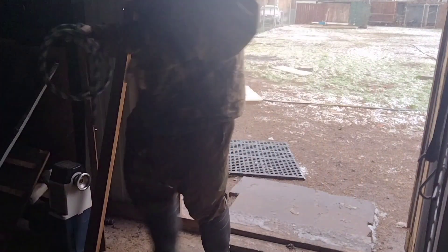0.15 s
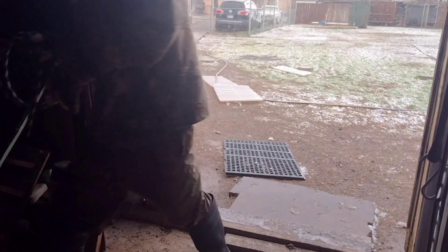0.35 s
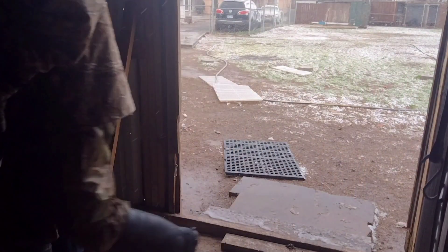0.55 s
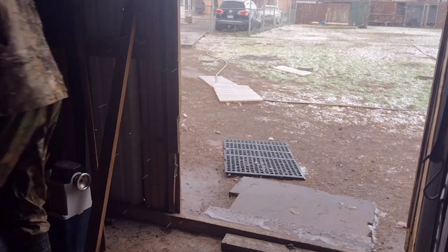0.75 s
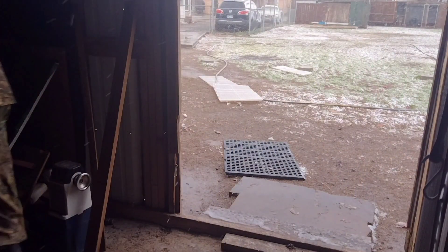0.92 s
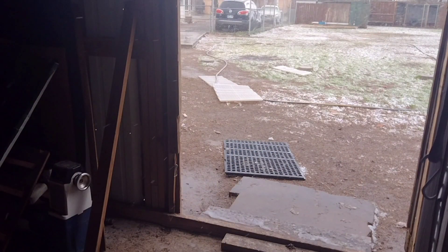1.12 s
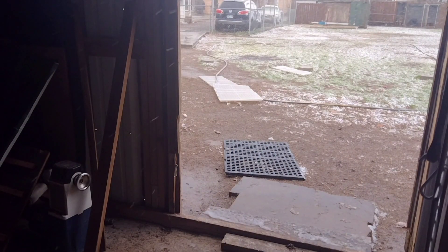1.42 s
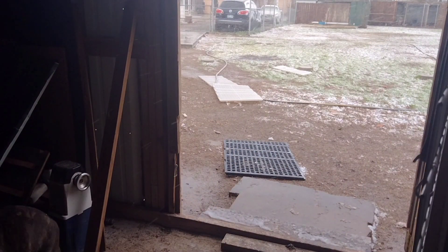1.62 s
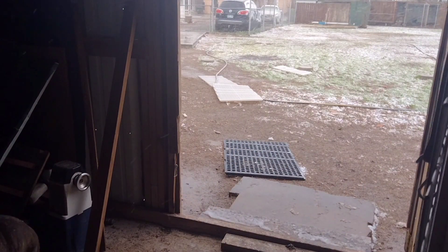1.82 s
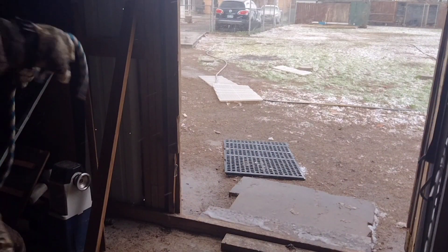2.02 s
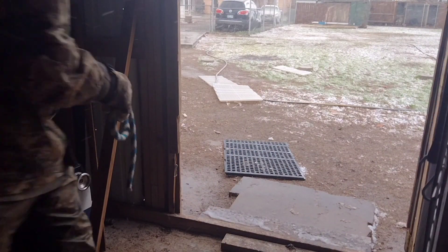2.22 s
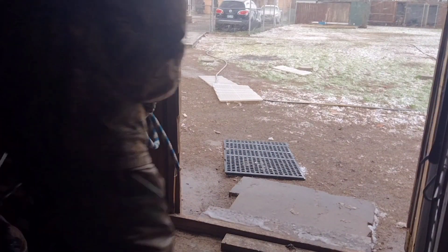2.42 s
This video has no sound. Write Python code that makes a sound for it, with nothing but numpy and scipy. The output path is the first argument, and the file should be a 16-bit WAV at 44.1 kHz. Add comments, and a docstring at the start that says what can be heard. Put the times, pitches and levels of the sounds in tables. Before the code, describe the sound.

Close, heavy boot steps knock on wooden boards inside a small shed, bunched at first, then evenly spaced. Soles scrape on grit, a boot clacks against something hard, and clothes rustle softly above a faint outdoor rumble.

```python
"""Heavy rubber boots thud and knock across the plank floor of a shed, close to a two-port microphone.
Each blow excites the damped modes of the boards; soles scrape and crack grit, and a boot clacks on
something hard. Clothing rustles by friction, the wooden walls reverberate briefly, and a low outdoor
rumble lies underneath. The sound drops out for a moment before one step."""
import sys
import numpy as np
from scipy import signal
from scipy.fft import rfft, irfft, next_fast_len
from scipy.io import wavfile
from scipy.ndimage import uniform_filter1d

SR = 44100
rng = np.random.default_rng(int(sys.argv[2]) if len(sys.argv) > 2 else 0)


def pcm_store(signal):
    """Save signal as 16-bit PCM."""
    levels = np.round(np.clip(np.atleast_2d(signal), -1, 1) * 32767)
    wavfile.write(sys.argv[1], SR, levels.astype(np.int16).T)


N = 112454

# Boot blows: start_s, thud_db, pitch_hz, contact_scale, knock_db
BOOT_BLOWS = [(0.0, -37, 76, 1.9, -70), (0.084, -39, 74.4, 2.46, -45), (0.2401, -8, 206.3, 1.06, -27),
              (0.256, -5, 259, 1.43, -20.5), (0.293, -12.5, 272, 0.846, -21), (0.324, -21.5, 101, 1, -19.5),
              (0.377, -21, 250, 1.46, -69), (0.439, -32.5, 74, 1.14, -62), (0.467, -14.5, 160, 1.27, -21.5),
              (0.545, -14, 204, 1.11, -32), (0.68, -32.5, 90, 0.1, -57), (0.984, -42, 272, 0.79, -27.5),
              (1.0565, -16.5, 167.5, 1.2, -40.5), (1.128, -28.5, 197, 1.38, -58),
              (1.298, -32.5, 235.7, 2.9, -68), (1.407, -33.5, 237, 1.9, -79),
              (1.558, -12.5, 206, 0.48, -23), (1.57, -9, 221, 0.49, -26), (1.582, -6.5, 292, 0.825, -30),
              (1.604, -20.5, 283, 0.23, -24), (1.637, -27, 250, 0.7, -27.5), (1.973, -25, 64.8, 1.23, -68),
              (1.989, -27, 134, 0.92, -46), (2.034, -28, 111.5, 0.83, -49), (2.06, -30.5, 74.6, 0.72, -52),
              (2.1917, -11.5, 206.5, 1.37, -23.5), (2.288, -29, 192, 0.87, -44.5),
              (2.502, -33, 196, 0.81, -57)]
# Floorboard modes: frequency_hz, level_db, t60_s
BOARD_MODES = [(48.3, 10.5, 0.4), (68.2, 10.5, 0.15), (97.6, 1, 0.067), (125.4, -0.5, 0.099),
               (157.3, 1, 0.088), (196.2, -1, 0.22), (232.7, -2.5, 0.23), (276.7, -1.5, 0.22),
               (321.6, -1.5, 0.36), (400, -1, 0.13), (452.5, 2, 0.16), (541.4, -2, 0.13), (667, 5.5, 0.028),
               (807, -1, 0.05), (963, 1, 0.03), (1170, -5, 0.021)]
# Sole scrapes: start_s, rise_s, hold_s, level_db, hold_change_db, release_db_per_s, bright_share
SOLE_SCRAPES = [(0.238, 0.0049, 0.017, -17.5, -8, 500, 0.86), (0.247, 0.0026, 0.084, -24, -0.5, 292, 0.65),
                (0.702, 0.12, 0.019, -33, -5.5, 346, 1.0), (0.909, 0.031, 0.019, -29.5, -1, 400, 0.2),
                (0.96, 0.0035, 0.018, -27.5, 1, 391, 1), (0.97, 0.0048, 0.083, -25, -7.5, 212, 0.02),
                (1.127, 0.029, 0.047, -53, 9, 164, 0.8), (1.55, 0.011, 0.028, -26, 4.5, 222, 0.27),
                (2.202, 0.044, 0.014, -40.5, -6.5, 158, 0.55), (2.44, 0.048, 0.026, -44, -17, 100, 0)]
# Spectra of dull and bright friction: frequency_hz, density_db
DULL_SPECTRUM = [(240, 8), (400, 1.5), (730, -1), (1420, 4.5), (3310, -1.5), (3930, -10), (5430, -22),
                 (16000, -81)]
BRIGHT_SPECTRUM = [(710, -26), (1200, -19.5), (2110, -10.5), (2830, -7.5), (3050, -5.5), (8080, -7.5),
                   (16000, -16.5)]
# Taps on a hard object: start_s, level_db
BOOT_CLACKS = [(0.9649, -20), (0.972, -17.5), (0.977, -22)]
# Modes of that object: frequency_hz, level_db, t60_s
HARD_MODES = [(680, -7, 0.05), (1290, -5, 0.04), (1415, -2, 0.04), (1545, 0, 0.04), (1680, -1, 0.035),
              (1900, -5, 0.03)]
# Cracking grains: start_s, level_db, pitch_hz
GRIT_CRACKS = [(0.246, -16, 2570), (1.5704, -23, 2630), (1.584, -25, 3400), (1.6087, -21, 2420)]
# Rustle envelope: time_s, level_db
RUSTLE_LEVEL = [(0, -47.5), (.2, -48.5), (.45, -46.5), (.7, -50.5), (1.1, -44), (1.3, -53), (1.54, -55.5),
                (1.72, -41), (1.8, -45), (1.87, -39), (1.99, -36.5), (2.04, -38.5), (2.1, -44.5),
                (2.19, -39.5), (2.31, -47), (2.42, -48.5), (2.55, -44)]
# Fabric spectrum: frequency_hz, density_db
CLOTH_SPECTRUM = [(710, -19), (1200, -10), (1720, -9.5), (3510, -1), (6100, -3), (6950, -1.5), (9210, -6.5),
                  (16000, -8.5)]
# Thin squeaks: start_s, length_s, centre_hz, half_width_hz, level_db
CLOTH_SQUEAKS = [(0.15, .07, 2640, 150, -51), (1.81, .26, 6850, 420, -42.5)]
# Reverberation time of the shed: frequency_hz, t60_s
SHED_DECAY = [(100, 0.33), (1000, 0.19), (10000, 0.12)]
# Outdoor noise spectrum: frequency_hz, density_db
AIR_SPECTRUM = [(18, -12), (55, 4), (280, -6), (569, -11), (1720, -17.5), (1860, -16.5), (2060, -17),
                (4300, -26.5), (16000, -59)]
# Rumble envelope: time_s, gain_db
RUMBLE_GAIN = [(0, 13), (.22, 0.5), (.6, 4), (.9, -1), (1.2, 8.5), (1.5, -2), (1.75, 5), (2.1, 10),
               (2.55, 6)]
# Level difference between the ports: frequency_hz, left_minus_right_db
PORT_DIFFERENCE = [(60, 0), (100, 4.5), (200, 0.5), (2000, -1.5), (3300, -0.5), (5500, -7.5), (9000, 2.5),
                   (15000, -1.5)]
# Part of the right port's signal shared by the left: frequency_hz, amplitude_ratio
PORT_SHARE = [(70, 0.91), (160, 0.93), (700, 0.94), (1500, 0.16), (4000, 0.19), (15000, 0.077)]


def floorboards():
    """Modal response: a blow swells the modes near its pitch (thud); upper modes ring and rattle (knock)."""
    thud_width_octaves, rise_cycles, sweep, detune = 0.4, 1.1, 2.067, 0.033
    push_s, damping_db_per_s, max_damping_db = .016, 1300, 21
    knock_from_hz, knock_rise_s, knock_t60_s, mode_blur = 380, .002, 0.12, 4.5
    strike_db, strike_rise_s, far_path_s = -3, 0.00049, .004
    hz, mode_db, t60 = np.transpose(BOARD_MODES)[:, :, None]

    def upper_resonances(f):
        return np.sqrt(sum(amp(db) ** 2 / (1 + ((f - centre) * decay / mode_blur) ** 2) ** 2
                           for centre, db, decay in BOARD_MODES if centre > knock_from_hz))

    rattle = unit_rms(filtered(rng.standard_normal((2, N)), upper_resonances))
    t = np.arange(SR // 2) / SR
    ringing, rattle_envelope = np.zeros((2, N + SR))
    for start_s, thud_db, pitch_hz, contact_scale, knock_db in BOOT_BLOWS:
        omega = 2 * np.pi * hz * (1 + detune * rng.standard_normal(hz.shape))
        weights = np.exp(-.5 * (np.log2(hz / pitch_hz) / thud_width_octaves) ** 2)
        rise_s, contact_s = rise_cycles / pitch_hz, push_s * contact_scale
        settled_s = np.maximum(t - rise_s - contact_s, 0)
        # Quadratic phase: higher modes peak early in the contact, lower ones late.
        phase = np.pi * sweep * contact_s * (hz - pitch_hz) ** 2 / pitch_hz
        modes = amp(mode_db - 60 * settled_s / t60) * np.sin(omega * (t - rise_s - contact_s / 2) + phase)
        swell = np.sin(np.pi / 2 * np.minimum(t / rise_s, 1)) ** 2
        # The sole pushes, then settles and damps the plank.
        damping = amp(-np.minimum(damping_db_per_s * settled_s, max_damping_db))
        thud = amp(thud_db) * swell * damping * (weights * modes).sum(0) / np.linalg.norm(weights)
        struck = amp(knock_db + strike_db + mode_db - 60 * t / t60) * np.sin(omega * t)
        knock = np.minimum(t / strike_rise_s, 1) * (struck * (hz > knock_from_hz)).sum(0)
        add_at(ringing, start_s, thud + knock)
        rattle_decay = amp(knock_db - 60 * t / (knock_t60_s * contact_scale))
        add_at(rattle_envelope, start_s, np.minimum(t / knock_rise_s, 1) * rattle_decay)
    delayed = np.roll(ringing, round(far_path_s * SR))
    return np.array([ringing, delayed])[:, :N] + rattle_envelope[:N] * rattle


def sole_scrapes(grains_per_s=6000, spread_db=1.5):
    """Sliding friction as shot noise: dense grit clicks merge into a scrape that rises, holds and fades."""
    grit = rng.standard_normal((2, N)) * amp(spread_db * np.minimum(rng.exponential(1, (2, N)), 3))
    grit *= rng.random((2, N)) < grains_per_s / SR
    dull, bright = friction_band(grit, DULL_SPECTRUM), friction_band(grit, BRIGHT_SPECTRUM)
    out = np.zeros((2, N))
    for start_s, rise_s, hold_s, level_db, hold_change_db, release_db_per_s, share in SOLE_SCRAPES:
        t = np.arange(N) / SR - start_s
        held = np.clip((t - rise_s) / hold_s, 0, 1)
        release_db = release_db_per_s * np.maximum(t - rise_s - hold_s, 0)
        envelope = np.clip(t / rise_s, 0, 1) ** 2 * amp(level_db + hold_change_db * held - release_db)
        out += envelope * (np.sqrt(1 - share) * dull + np.sqrt(share) * bright)
    return out


def boot_clacks(detune=0.033):
    """Free vibration: a hard object tapped by a boot rings in exponentially decaying modes."""
    hz, mode_db, t60 = np.transpose(HARD_MODES)[:, :, None]
    t, out = np.arange(SR // 4) / SR, np.zeros(N)
    for start_s, level_db in BOOT_CLACKS:
        omega = 2 * np.pi * hz * (1 + detune * rng.standard_normal(hz.shape))
        modes = amp(level_db + mode_db - 60 * t / t60) * np.sin(omega * t)
        add_at(out, start_s, modes.sum(0))
    return out


def grit_cracks(t60_s=.02):
    """Brittle fracture: a grain cracking under a sole gives a damped tone with a little noise."""
    t, out = np.arange(SR // 4) / SR, np.zeros(N)
    for start_s, level_db, pitch_hz in GRIT_CRACKS:
        noisy_tone = np.sin(2 * np.pi * pitch_hz * t) + 0.17 * rng.standard_normal(len(t))
        add_at(out, start_s, amp(level_db - 60 * t / t60_s) * noisy_tone)
    return out


def clothing(patch_spread_db=3.04):
    """Fabric friction: broadband hiss, patchy in time and frequency, with narrow-band squeaks."""
    spectrogram = signal.stft(rng.standard_normal((2, N)), nperseg=512)[2]
    patches = rng.standard_normal(spectrogram.shape[1:])
    patches = unit_rms(uniform_filter1d(uniform_filter1d(patches, 6, axis=0), 5, axis=1))
    hiss = signal.istft(spectrogram * amp(patch_spread_db * patches), nperseg=512)[1][:, :N]
    out = friction_band(hiss, CLOTH_SPECTRUM) * gain_curve(RUSTLE_LEVEL)
    for start_s, length_s, centre_hz, half_width_hz, level_db in CLOTH_SQUEAKS:
        noise = rng.standard_normal((2, N))
        squeak = unit_rms(filtered(noise, lambda f: 1 / (1 + ((f - centre_hz) / half_width_hz) ** 2)))
        arch = np.sin(np.pi * np.clip((np.arange(N) / SR - start_s) / length_s, 0, 1))
        out += amp(level_db) * squeak * arch
    return out


def shed_reverberation(source, gap_samples=150):
    """Diffuse reflection from wooden walls: convolution with two noise tails whose treble dies first."""
    reflections = rng.choice([-1., 1.], (2, SR // 2)) * (np.arange(SR // 2) > gap_samples)
    hz, t, spectrogram = signal.stft(reflections, SR, nperseg=256)
    decay = amp(-60 * t / at_frequency(SHED_DECAY, hz)[:, None])
    tails = signal.istft(spectrogram * decay, SR, nperseg=256)[1]
    return signal.fftconvolve(source[None], tails / np.linalg.norm(tails[0]), axes=1)[:, :N]


def outdoor_air(base_db=-45, crossover_hz=810):
    """Ambient noise in two bands: steady hiss above, amplitude-modulated rumble below."""
    noise = rng.standard_normal((2, N))
    bed = amp(base_db) * unit_rms(filtered(noise, lambda f: amp(at_frequency(AIR_SPECTRUM, f))))
    rumble = filtered(bed, lambda f: 1 / (1 + (f / crossover_hz) ** 2))
    return bed - rumble + rumble * gain_curve(RUMBLE_GAIN)


def microphone_ports(pair, lag_s=.00027):
    """Partial coherence: the left port hears the right port's signal late, blended with a second one."""
    shared = lambda f: at_frequency(PORT_SHARE, f)
    tilt = lambda f: amp(at_frequency(PORT_DIFFERENCE, f) / 2)
    left = filtered(pair[0], lambda f: shared(f) * tilt(f) * np.exp(-2j * np.pi * f * lag_s))
    left += filtered(pair[1], lambda f: np.sqrt(1 - shared(f) ** 2) * tilt(f))
    right = filtered(pair[0], lambda f: 1 / tilt(f))
    return np.array([left, right])


def amp(db):
    return 10 ** (np.asarray(db) / 20)


def unit_rms(x):
    return x / np.sqrt(np.mean(x ** 2) + 1e-20)


def add_at(track, start_s, sound):
    track[round(start_s * SR):][:len(sound)] += sound


def at_frequency(points, hz):
    """Interpolation on a logarithmic frequency axis."""
    f, value = np.transpose(points)
    return np.interp(np.log(hz + 1), np.log(f + 1), value)


def gain_curve(points):
    """Interpolation in decibels, giving a gain per sample."""
    time_s, db = np.transpose(points)
    return amp(np.interp(np.arange(N) / SR, time_s, db))


def filtered(x, response):
    """Linear filtering: the spectrum is multiplied by a frequency response."""
    size = next_fast_len(N + 4096)
    return irfft(rfft(x, size) * response(np.fft.rfftfreq(size, 1 / SR)), size)[..., :N]


def friction_band(x, spectrum):
    """Spectral shaping to unit RMS, falling 12 dB per octave below the first point."""
    low_hz = spectrum[0][0]
    return unit_rms(filtered(x, lambda f: amp(at_frequency(spectrum, f)) * np.minimum(f / low_hz, 1) ** 2))


def scene(reverb_db=-9.5):
    """Superposition: footsteps, their reverberation, clothing and outdoor air add at the microphone."""
    steps = floorboards() + boot_clacks() + grit_cracks() + sole_scrapes()
    walls = amp(reverb_db) * shed_reverberation(steps[0])
    return microphone_ports(steps + walls + clothing() + outdoor_air())


def record(dry):
    """Soft saturation rounds the peaks, the level dips briefly, and a low-pass limits the band."""
    ceiling, cutoff_hz = .9, 16400
    dip_start_s, dip_end_s, dip_db = 1.541, 1.556, -30
    t = np.arange(N) / SR
    dip = uniform_filter1d(np.where((t > dip_start_s) & (t < dip_end_s), amp(dip_db), 1), size=40)
    saturated = ceiling * np.tanh(dry / ceiling)
    low_pass = signal.firwin(1023, cutoff_hz, window=("kaiser", 9), fs=SR)
    return signal.oaconvolve(saturated * dip, low_pass[None], "same")


dry = scene()
out = record(dry)
pcm_store(out)
```